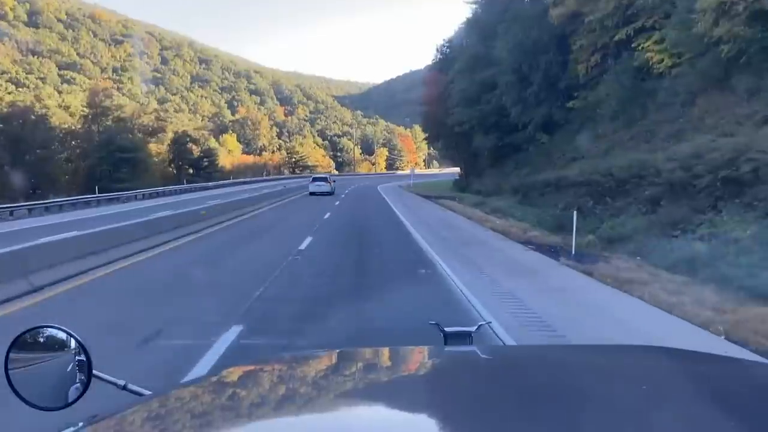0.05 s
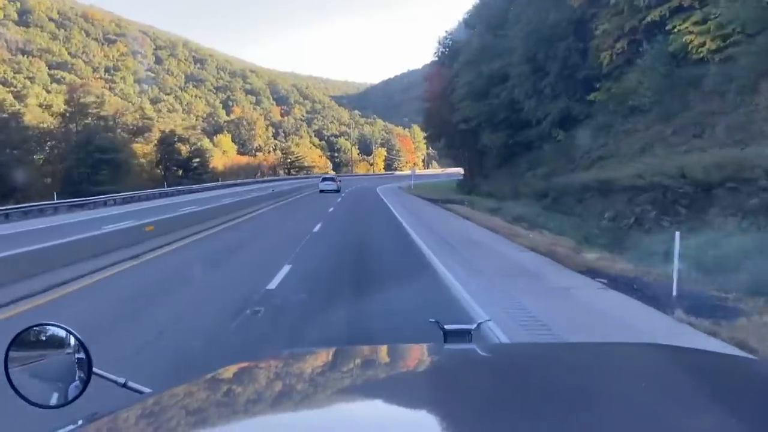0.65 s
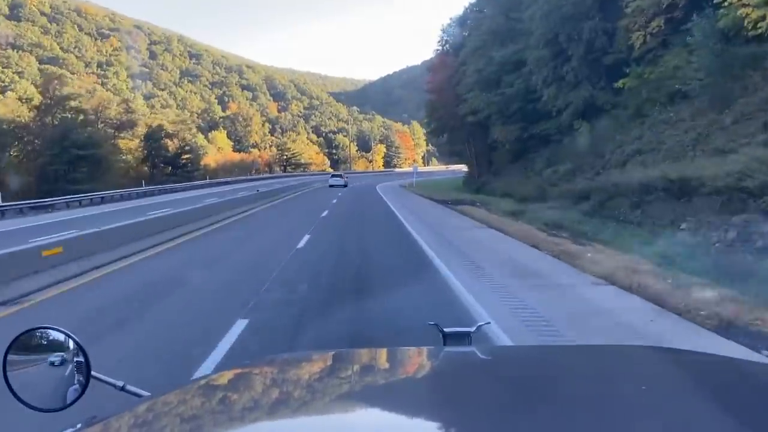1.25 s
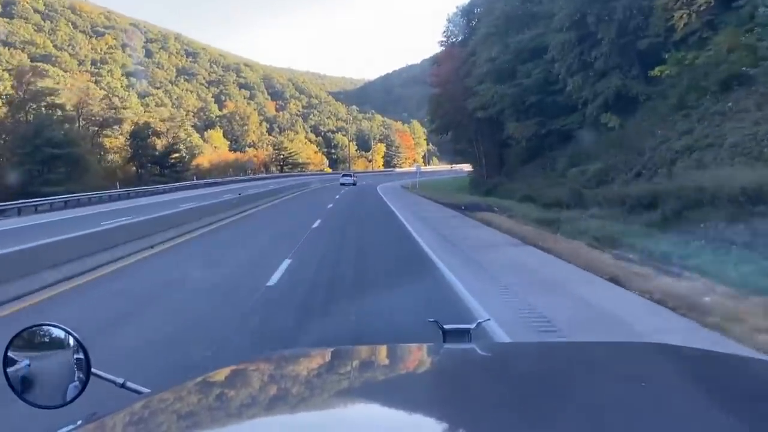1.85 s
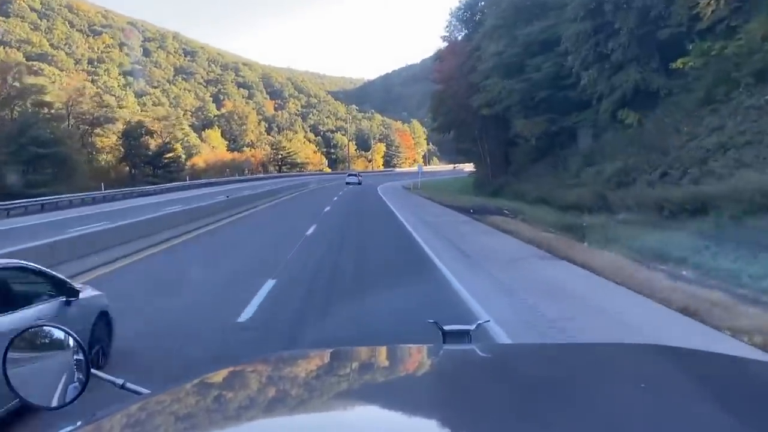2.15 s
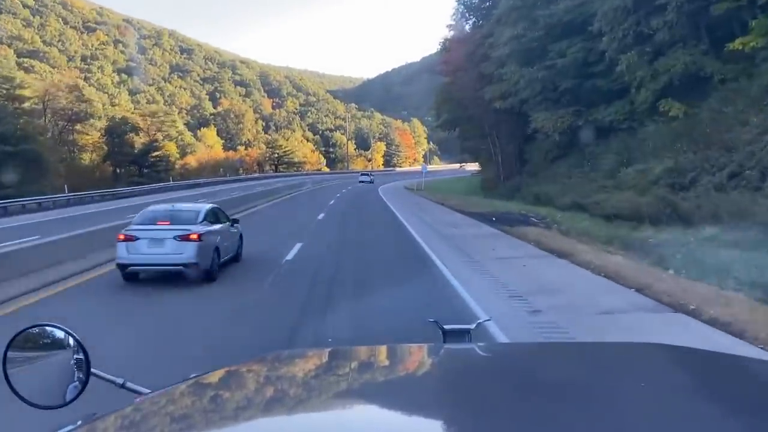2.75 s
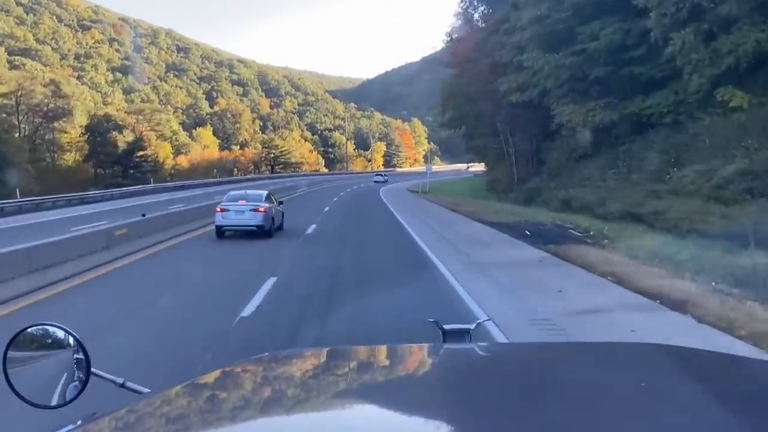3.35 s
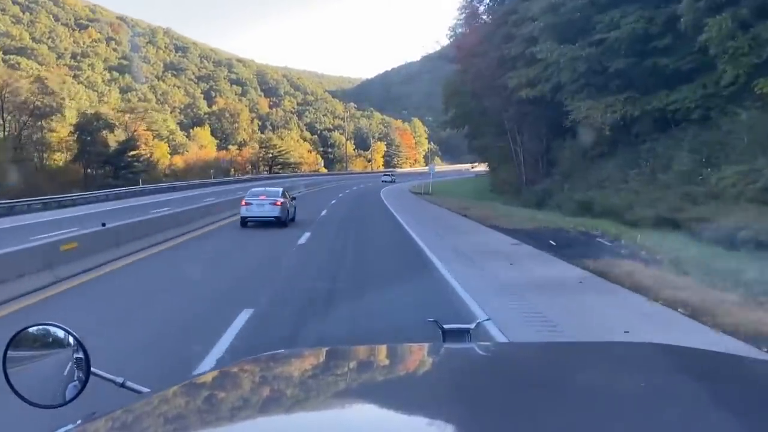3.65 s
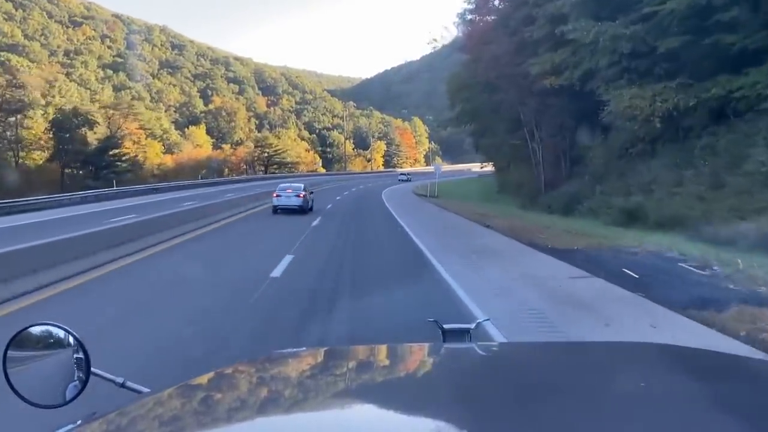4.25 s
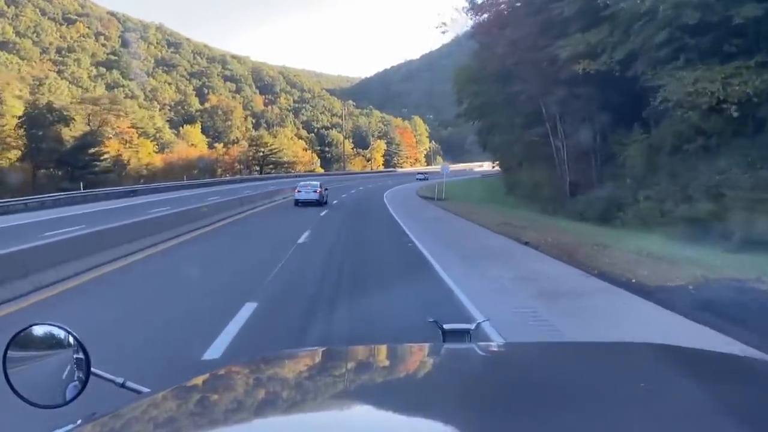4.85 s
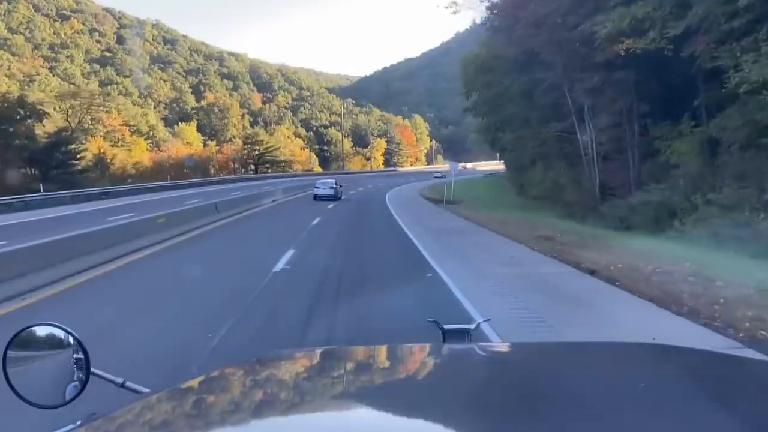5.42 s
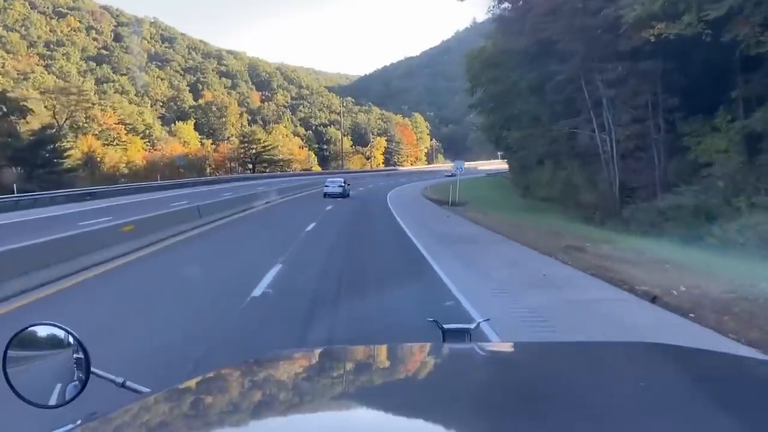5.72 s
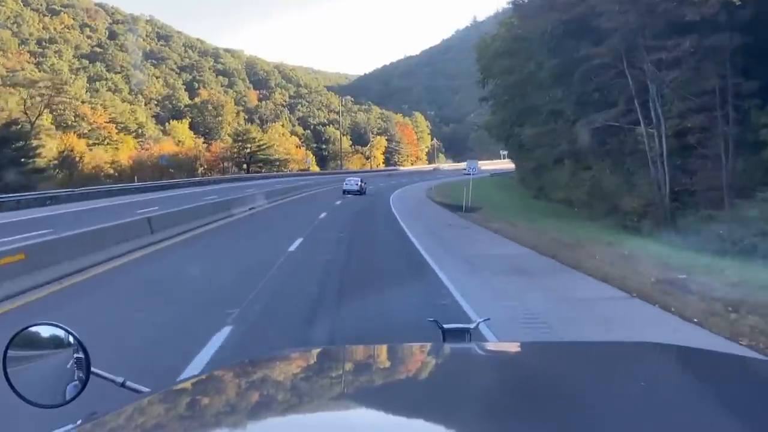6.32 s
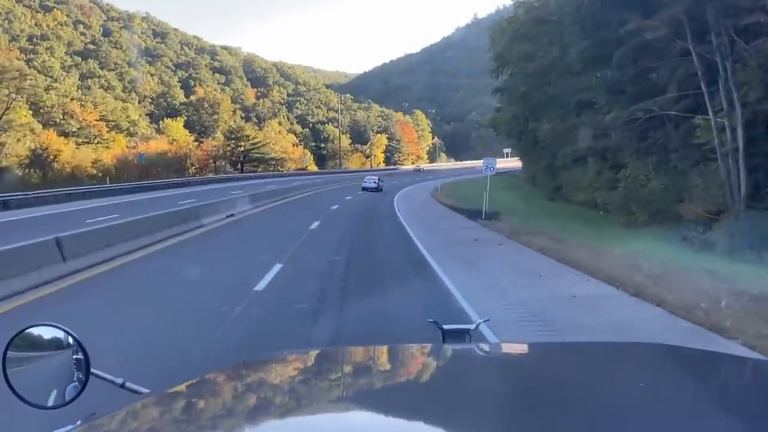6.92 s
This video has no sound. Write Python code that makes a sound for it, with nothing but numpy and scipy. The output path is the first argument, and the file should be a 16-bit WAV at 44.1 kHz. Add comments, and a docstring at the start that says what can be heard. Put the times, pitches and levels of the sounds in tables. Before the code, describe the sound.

A heavy diesel truck rolls downhill on its engine brake, heard from inside the cab. A deep, throbbing drone with a rasp on top runs throughout, its pitch sinking only slightly. Gears hum and whine over steady tyre roar, light wind hiss and faint high whistles. Early on, two road bumps thump softly through the cab and loose plastic trim ticks twice; a few weaker bumps follow.

```python
"""Truck cab on the engine brake

A heavy diesel descends a mountain road. Six cylinders dump compressed air into the exhaust:
a deep, throbbing drone with a rasp on top. Gears hum and whine, accessories whistle faintly,
tyres roar, wind hisses, and the cab thumps and ticks over a few bumps."""
import sys
import numpy as np
from scipy import signal
from scipy.fft import rfft, irfft, next_fast_len
from scipy.io import wavfile
from scipy.ndimage import map_coordinates

SR = 44100
rng = np.random.default_rng(int(sys.argv[2]) if len(sys.argv) > 2 else 0)


def wav_out(sig):
    """Save sig, one row per channel (or a flat mono array), as 16-bit PCM at SR to the path in sys.argv[1]."""
    wavfile.write(sys.argv[1], SR, np.round(np.clip(np.atleast_2d(sig).T, -1, 1) * 32767).astype(np.int16))


N = 307818
TIME = np.arange(N) / SR

# release strength per cylinder, in firing order (relative level [dB])
CYLINDER_DB = [3.5, 7, -1, -0.5, 3, 3]


def amp(db):
    """Decibels to gain."""
    return 10 ** (np.asarray(db) / 20)


def unit(x):
    """Scale to rms 1."""
    return x / np.sqrt(np.mean(x ** 2) + 1e-20)


def along(points, hz):
    """Interpolate (frequency [Hz], value) points on a log axis."""
    point_hz, values = np.transpose(points)
    return np.interp(np.log(hz + 1), np.log(point_hz + 1), values)


def wobble(rate_hz):
    """Smooth random curve, rate_hz knots per second."""
    knots = rng.standard_normal(4096)
    coarse_s = TIME[::32]
    curve = map_coordinates(knots, [coarse_s * rate_hz + 2], mode="mirror")
    return np.interp(TIME, coarse_s, curve)


def filtered(x, response):
    """Apply a complex frequency response."""
    size = next_fast_len(N + SR // 2)
    hz = np.fft.rfftfreq(size, 1 / SR)
    return irfft(rfft(x, size) * response(hz), size)[..., :N]


def split(difference):
    """Left-right difference as +half left, -half right."""
    return np.array([[.5], [-.5]]) * difference


def noise():
    """Two independent white noises."""
    return rng.standard_normal((2, N))


def in_cab(pair, spectrum):
    """Colour two independent signals and blend them into the cab's stereo field, rms 1."""
    # left-right likeness (frequency [Hz], coherence [0..1])
    coherence = [(60, .98), (140, .92), (220, .75), (340, .4), (550, .65), (800, .72), (1200, .4),
                 (1700, .3), (2300, .58), (4500, .6), (5700, .35), (7000, .95)]
    # balance (frequency [Hz], left-right [dB])
    balance = [(60, 3.5), (110, -8), (200, 6), (380, 1), (700, 2.5), (1290, 0.5), (2380, 2.5), (4400, 3),
               (8120, -0.5), (15000, 1.5)]
    # phase between sides (frequency [Hz], left lead [rad])
    left_lead = [(220, 0), (340, .6), (450, 3), (780, 4.3), (900, 3.5), (1400, 3.1), (2150, .6), (3300, .7),
                 (5500, 0), (7500, 0), (8350, -3), (9560, -3.2), (10400, -6.3), (11700, -6.2),
                 (12500, -9.2), (13800, -9.6), (14600, -12.6)]

    def blend(hz):
        angle = np.arccos(np.clip(along(coherence, hz), 0, 1)) / 2
        return amp(along(spectrum, hz)) * [np.cos(angle), np.sin(angle)]

    def place(hz):
        return amp(split(along(balance, hz))) * np.exp(1j * split(along(left_lead, hz)))

    mid, side = filtered(pair, blend)
    return unit(filtered(np.array([mid + side, mid - side]), place))


def wind(level_db):
    """Air hisses round the cab."""
    # hiss spectrum (frequency [Hz], relative density [dB])
    spectrum = [(600, -28), (1400, -6), (1570, 6.5), (1750, -0.5), (2450, -1), (3100, -9), (3800, -9.5),
                (5000, -13), (6000, -17.5), (7600, -20), (9200, -22), (10200, -23), (13000, -24.5),
                (15700, -30)]
    return amp(level_db + .15 * wobble(4.7) + .59 * wobble(22)) * in_cab(noise(), spectrum)


def tyres(level_db):
    """Tyres roar on the road."""
    # roar spectrum (frequency [Hz], relative density [dB])
    spectrum = [(25, -34.5), (45, -0.5), (60, 10), (100, 7.5), (140, 7.5), (180, 0.5), (220, 7.5),
                (300, 0.5), (370, 4.5), (450, -2), (700, -5), (930, -3.5), (1150, -9.5), (1500, -17.5),
                (6000, -91.5)]
    return amp(level_db + .46 * wobble(13)) * in_cab(noise(), spectrum)


def suspension(floor_db, vary_db, attack_s, release_s):
    """The road shakes the suspension: low rumble, swelling at each bump."""
    # road bumps (time [s], level [dB], hold [s])
    bumps = [(0.52, -24, 0.05), (1.10, -21, 0.11), (1.93, -35, 0.06), (2.42, -34, 0.12), (2.89, -32, 0.06),
             (6.68, -33, 0.2)]
    # rumble spectrum (frequency [Hz], relative density [dB])
    spectrum = [(15, -26.5), (26, -19), (35, -8), (42, 6), (55, -4), (80, -16), (200, -60.5), (500, -120)]
    power = amp(floor_db + vary_db * wobble(7)) ** 2
    for start_s, db, hold_s in bumps:
        attack = np.clip((TIME - start_s) / attack_s, 0, 1)
        release = np.exp(-np.maximum(TIME - start_s - attack_s - hold_s, 0) / release_s)
        power += (amp(db) * attack * release) ** 2
    return np.sqrt(power) * in_cab(noise(), spectrum)


def trim_ticks(t60_s, rise_s):
    """Loose plastic trim ticks as the cab is jolted."""
    # trim ticks (time [s], level [dB])
    ticks = [(0.551, -36), (0.81, -41)]
    # tick spectrum (frequency [Hz], relative density [dB])
    spectrum = [(800, -20), (2400, 4), (5000, 3), (8000, -4), (11000, -2.5), (15000, -12)]
    envelope = np.zeros(N)
    for start_s, db in ticks:
        age_s = np.maximum(TIME - start_s, 0)
        envelope += amp(db - 60 * age_s / t60_s) * (1 - np.exp(-age_s / rise_s))
    return envelope * in_cab(noise(), spectrum)


def whistles(cycle_hz, blur_hz, flicker_db, fade_s):
    """Engine accessories whistle unsteadily; pitch sinks with engine speed."""
    # whistles (frequency at mean speed [Hz], level [dB], start [s], end [s])
    tones = [(3795, -63.5, 0, 3.8), (5058, -60.5, 1.33, 1.64), (5058, -60.5, 1.84, 2.35),
             (5058, -63.5, 2.35, 3.2), (5065, -68, 3.2, 6.98), (6577, -71, 0.8, 6.98)]
    out = np.zeros(N)
    for hz, db, start_s, end_s in tones:
        pitch_hz = hz * cycle_hz / cycle_hz.mean() + blur_hz * wobble(70)
        phase = 2 * np.pi * np.cumsum(pitch_hz) / SR
        gate = np.clip(.5 + np.minimum(TIME - start_s, end_s - TIME) / fade_s, 0, 1)
        out += amp(db + flicker_db * wobble(13)) * gate * np.sqrt(2) * np.sin(phase)
    return out * amp(split(2.5))


def gears(cycle, waver_db, wander_cycles):
    """Meshing teeth hum and whine; shaft play unsettles the high meshes most."""
    # beating mesh tones (order [x cycle rate], level [dB], left-right [dB], left lead [rad])
    meshes = [(21.43, -25.5, 1.5, 0), (61, -46.5, 5, 4.5), (61.43, -40.5, 0, 4.6), (62, -42.5, 1, 4.6),
              (63, -43.5, 4, 4.6), (64, -46, 7, 4.5)]
    out = np.zeros((2, N))
    for order, db, pan_db, lead_rad in meshes:
        phase = 2 * np.pi * (order * (cycle + wander_cycles * wobble(14)) + rng.uniform())
        gain = amp(db + waver_db * wobble(12) + split(pan_db))
        out += gain * np.sqrt(2) * np.sin(phase + split(lead_rad))
    return out


def engine_speed(base_hz, slowing_hz_per_s, excess_hz, settle_s):
    """Four-stroke cycle rate [Hz]: a small excess dies away as the brake slows the truck evenly."""
    return base_hz - slowing_hz_per_s * TIME + excess_hz * np.exp(-TIME / settle_s)


def valve_flow(cycle, fall_firings, scatter_db):
    """Brake valves release six puffs a cycle: sharp start, quick fall."""
    firing = cycle * len(CYLINDER_DB)
    index = firing.astype(int)
    size_db = np.array(CYLINDER_DB)[index % len(CYLINDER_DB)]
    size_db = size_db + scatter_db * rng.standard_normal(1024)[index]
    return unit(amp(size_db) * np.exp(-(firing % 1) / fall_firings))


def rasp(cycle, flow, ring_db, puff_db, panel_t60_s):
    """Each release blows turbulence and knocks the cab panels, each cylinder by its own path."""
    # rasp spectrum (frequency [Hz], relative density [dB])
    spectrum = [(100, -58), (260, -22), (330, 0), (420, -3.5), (520, 6), (600, -0.5), (710, -7), (760, 9.5),
                (820, -7), (930, -6), (1200, -15), (2400, -25), (4000, -37), (9000, -76)]
    knocks = np.maximum(np.diff(flow, prepend=flow[0]), 0)
    cylinder = (cycle % 1 * len(CYLINDER_DB)).astype(int)
    decay = amp(-60 * TIME[:SR // 8] / panel_t60_s)
    ring = np.zeros((2, N))
    for k in range(len(CYLINDER_DB)):
        panels = rng.standard_normal((2, len(decay))) * decay
        own_knocks = knocks * (cylinder == k)
        ring += signal.fftconvolve(own_knocks[None], panels, axes=1)[:, :N]
    return amp(ring_db) * in_cab(ring, spectrum) + amp(puff_db) * in_cab(noise() * flow, spectrum)


def exhaust_drone(cycle, cycle_hz, waver_db, throb_waver_db, throb_wander_rad, dispersion_rad):
    """Firing harmonics pulse in step; unequal cylinders add the orders between, which throb."""
    # exhaust partials (order [x cycle rate], base level [dB], left-right [dB], left lead [rad])
    partials = [(4, -40.2, 0.1, -0.1), (5, -34.8, 1.1, -0.2), (6, -17.8, 4.2, -0.1), (7, -37.1, 3.4, 0.1),
                (8, -35.8, 0.4, -0.6), (9, -29.0, 1.3, -0.0), (10, -26.2, -0.4, 0.1), (11, -33.3, 3.7, 0.2),
                (12, -23.1, 5.7, 0.6), (13, -39.6, 3.2, 1.1), (14, -39.2, -5.2, 0.0),
                (15, -44.9, -10.0, 1.3), (16, -28.8, -0.7, -0.1), (17, -34.2, -5.1, -0.0),
                (18, -17.6, -5.7, 0.1), (19, -39.2, -0.9, 0.4), (20, -38.7, -3.7, -0.2),
                (21, -35.4, 4.4, 0.4), (22, -29.7, -1.8, -0.4), (24, -37.1, 10.8, -2.1),
                (27, -45.1, 12.1, 0.3), (28, -41.2, 4.6, 2.5), (34, -42.6, 2.7, -2.1), (36, -45, -0.3, 3.0),
                (39, -43.5, -3.4, -3.0), (42, -43.5, -3.3, -3.1), (45, -41.3, -4.2, -2.0),
                (48, -41.8, -2.3, -2.8), (57, -44.5, -0.3, -2.7), (66, -44.4, 1.2, -2.7)]
    # cab boom on the third firing harmonic (time [s], gain [dB])
    boom = [(0.4, -1.5), (0.95, 0.3), (4.0, 0.54), (6.98, -0.4)]
    boom_db = np.interp(TIME, *np.transpose(boom))
    note_db = -1.46 + 7 * (cycle_hz[0] - cycle_hz)  # firing note grows as the engine slows
    out = np.zeros((2, N))
    for order, db, pan_db, lead_rad in partials:
        harmonic = order / len(CYLINDER_DB)
        start_rad = rng.uniform(0, 2 * np.pi)
        swell, drift = wobble(7), wobble(4.7)
        if harmonic % 1 == 0:
            level_db = db + waver_db * swell + note_db * (harmonic == 1) + boom_db * (harmonic == 3)
            offset_rad = dispersion_rad * (harmonic - 1) * (harmonic - 2)  # pipe smears each pulse
        else:
            level_db = db + throb_waver_db * swell
            offset_rad = start_rad + throb_wander_rad * drift
        phase = 2 * np.pi * order * cycle + offset_rad + split(lead_rad)
        out += amp(level_db + split(pan_db)) * np.sqrt(2) * np.cos(phase)
    return out


def scene():
    """Engine, driveline and road, summed in the cab."""
    cycle_hz = engine_speed(base_hz=12.298, slowing_hz_per_s=.036, excess_hz=.07, settle_s=.6)
    cycle = np.cumsum(cycle_hz * (1 + .0004 * wobble(9))) / SR
    flow = valve_flow(cycle, fall_firings=.35, scatter_db=1.35)
    mix = exhaust_drone(cycle, cycle_hz, waver_db=.03, throb_waver_db=.1,
                        throb_wander_rad=.033, dispersion_rad=1.453)
    mix += rasp(cycle, flow, ring_db=-31, puff_db=-40.5, panel_t60_s=.07)
    mix += gears(cycle, waver_db=1.65, wander_cycles=.0011)
    mix += whistles(cycle_hz, blur_hz=9, flicker_db=4, fade_s=.05)
    mix += suspension(floor_db=-36.5, vary_db=2.5, attack_s=.03, release_s=.05)
    mix += tyres(level_db=-22.5) + wind(level_db=-40)
    return mix + trim_ticks(t60_s=.08, rise_s=.002)


def record(dry):
    """Click-free fades at both ends, then a steep low-pass."""
    fade_s, cutoff_hz = .008, 15800
    ramp = np.clip(np.minimum(TIME, TIME[-1] - TIME) / fade_s, 0, 1)
    low_pass = signal.ellip(12, .05, 60, cutoff_hz, fs=SR, output="sos")
    return signal.sosfilt(low_pass, dry * np.sin(ramp * np.pi / 2) ** 2)


dry = scene()
out = record(dry)
wav_out(out)
```